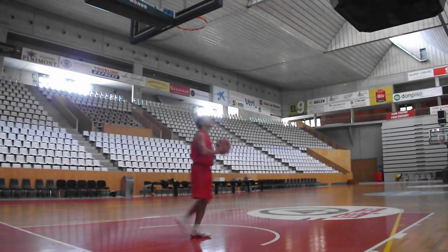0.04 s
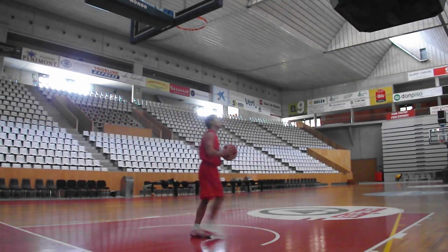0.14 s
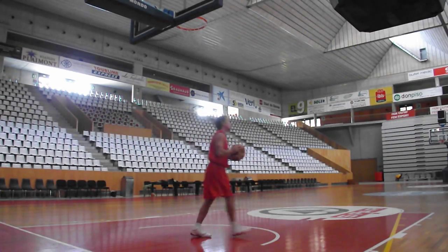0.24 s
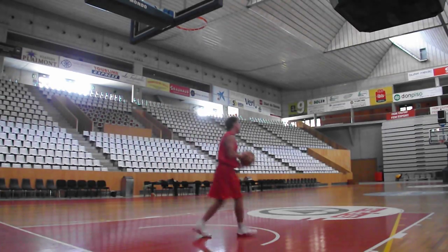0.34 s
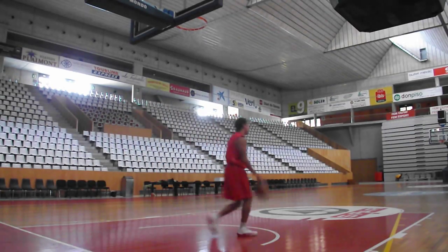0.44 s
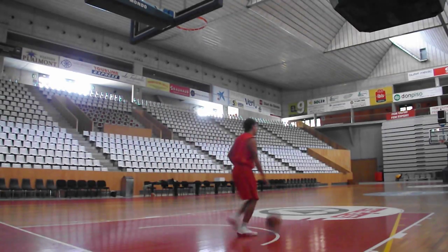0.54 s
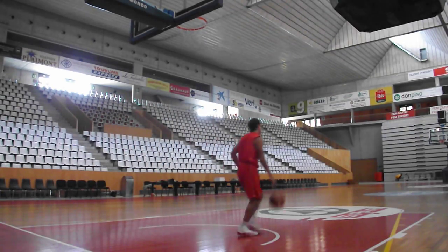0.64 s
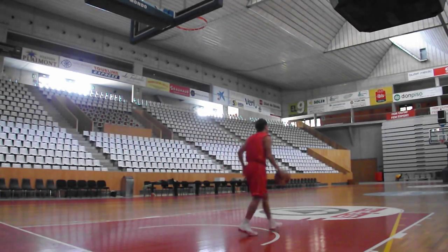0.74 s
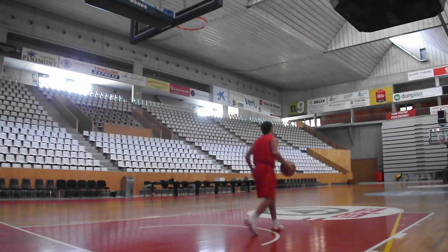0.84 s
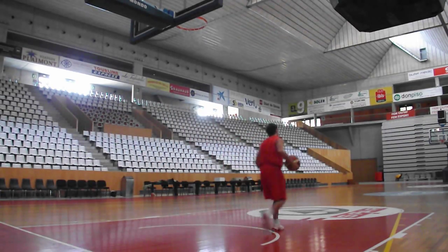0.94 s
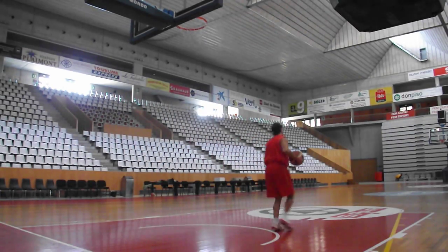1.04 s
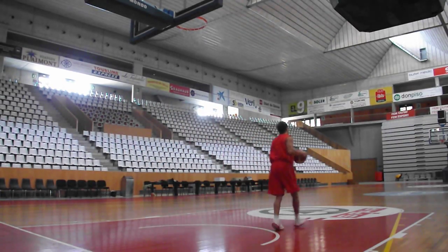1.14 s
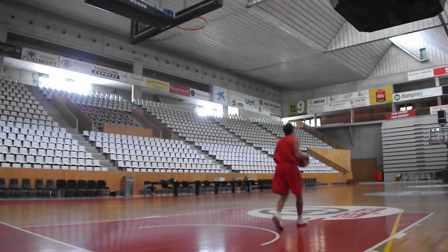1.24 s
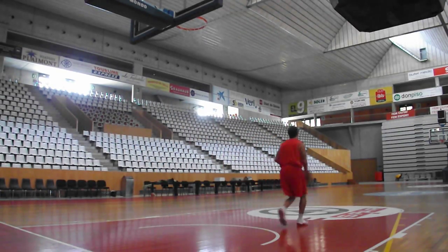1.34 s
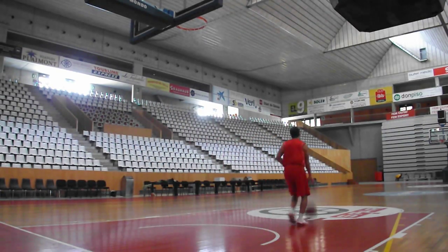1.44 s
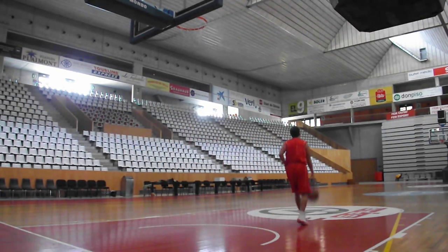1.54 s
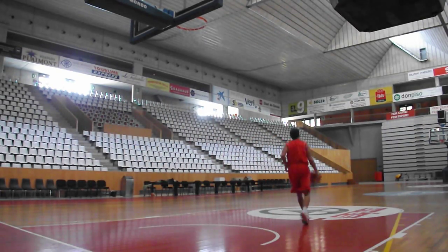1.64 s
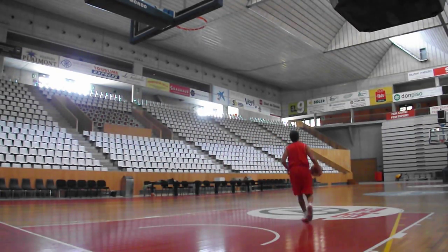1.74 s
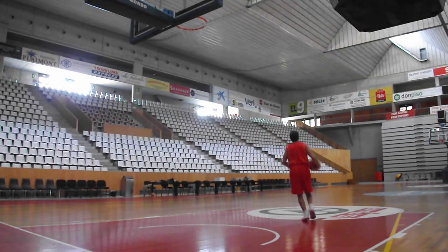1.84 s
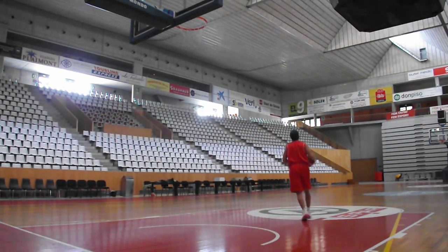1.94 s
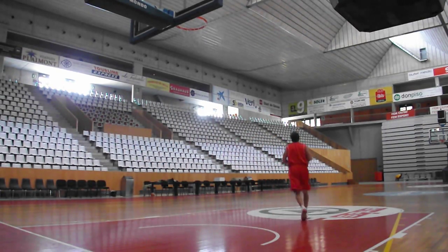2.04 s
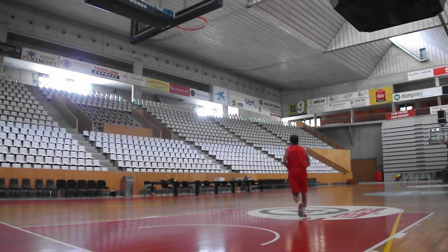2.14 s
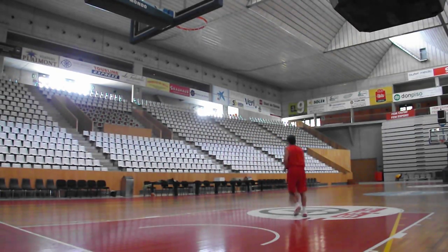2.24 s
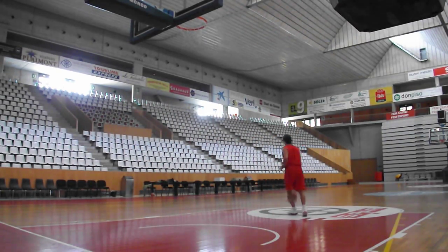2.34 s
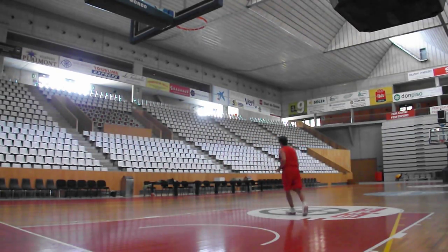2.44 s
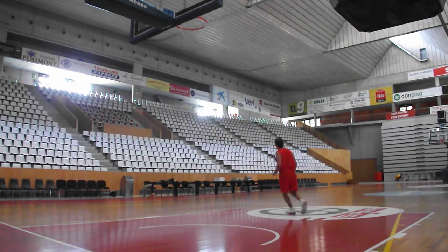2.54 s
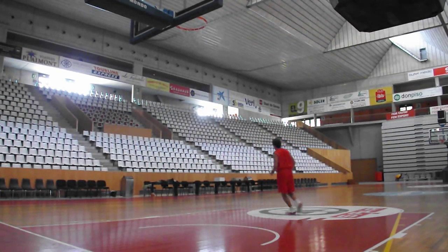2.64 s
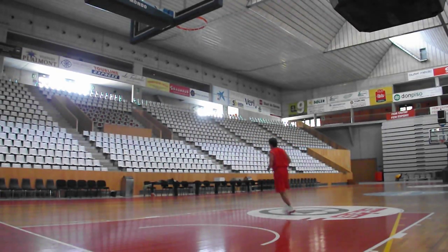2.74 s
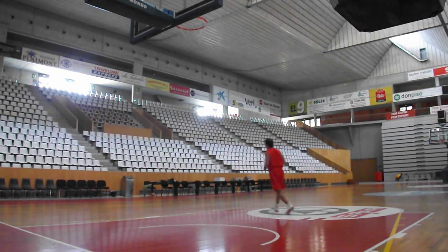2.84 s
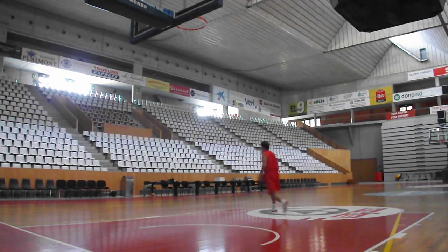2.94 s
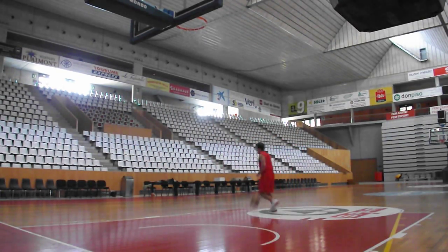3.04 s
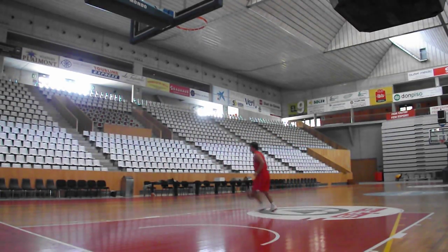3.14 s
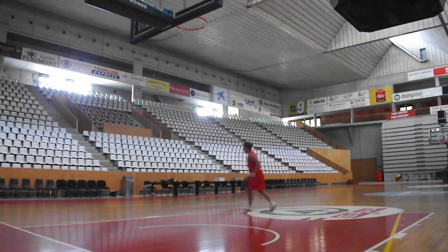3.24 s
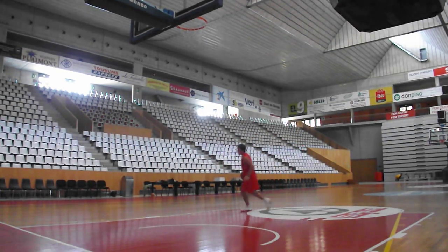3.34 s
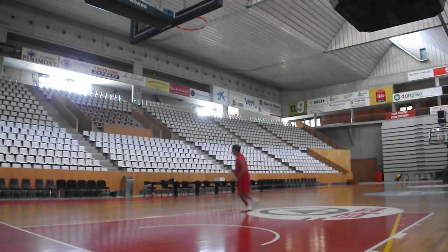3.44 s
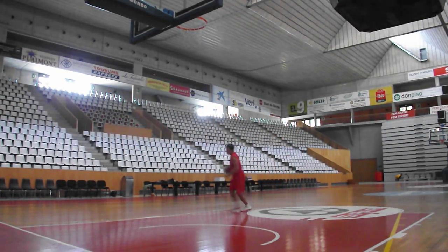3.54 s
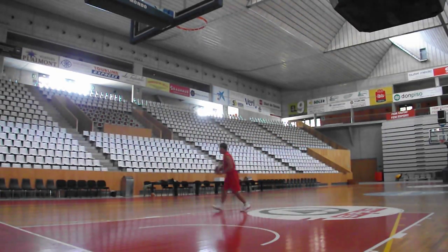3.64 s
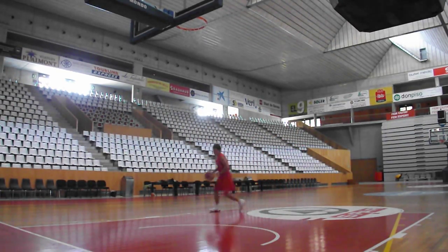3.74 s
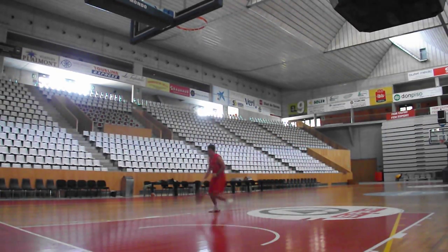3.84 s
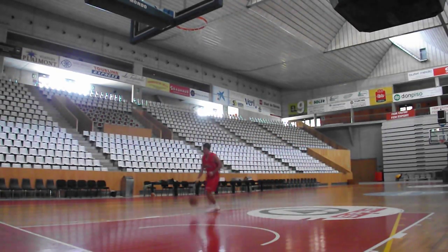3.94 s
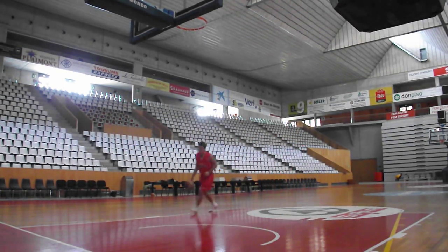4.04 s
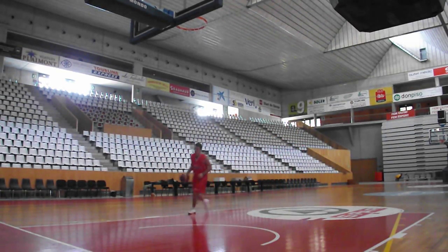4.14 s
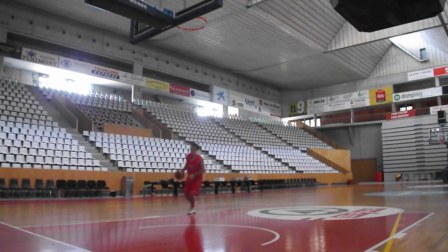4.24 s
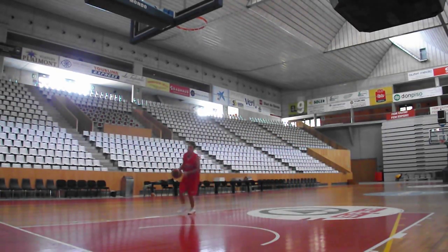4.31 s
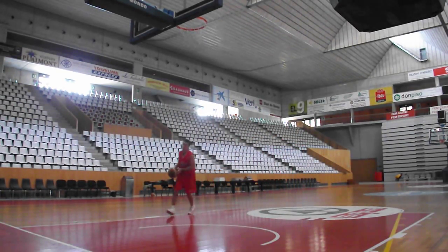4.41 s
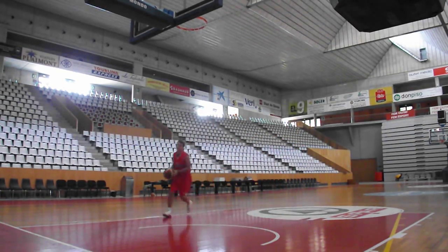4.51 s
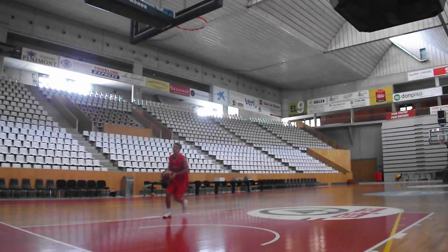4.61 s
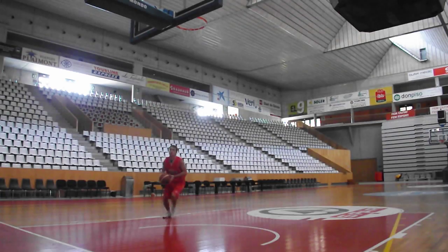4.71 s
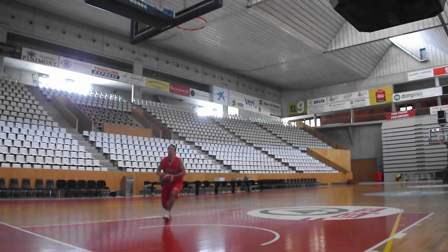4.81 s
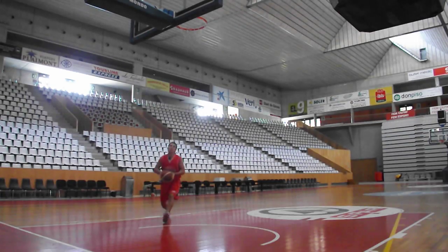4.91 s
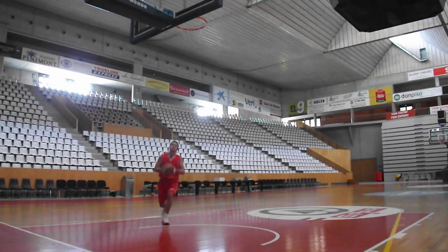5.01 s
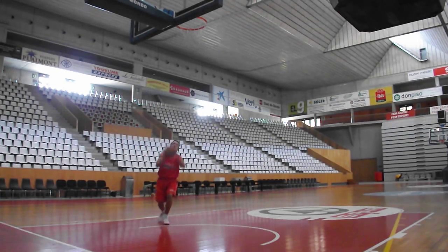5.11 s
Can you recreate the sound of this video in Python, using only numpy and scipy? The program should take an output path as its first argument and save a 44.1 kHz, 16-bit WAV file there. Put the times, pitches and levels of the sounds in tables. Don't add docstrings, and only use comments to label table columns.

```python
import sys
import numpy as np
from scipy import signal
from scipy.fft import rfft, irfft, next_fast_len
from scipy.io import wavfile
from scipy.ndimage import uniform_filter1d, map_coordinates

SR = 44100
rng = np.random.default_rng(int(sys.argv[2]) if len(sys.argv) > 2 else 0)


def to_wav(sig):
    pcm = np.clip(np.atleast_2d(sig), -1, 1) * 32767
    pcm = np.round(pcm).astype(np.int16)
    wavfile.write(sys.argv[1], SR, pcm.T)


def linear_from_db(decibels):
    return 10 ** (np.asarray(decibels, float) / 20)


N = 227952

# time in seconds, slap level in dB, thump level in dB, slap pitch as a ratio.
BOUNCES = [
    (0.5551, 9, 3, 0.91),
    (1.4714, 8.5, -1, 0.84),
    (2.314, 5.5, -2, 0.99),
    (3.0789, 9.5, -5.5, 0.98),
    (3.9207, 4, -3, 0.89),
]
# ball cavity level in dB, treble level in dB.
SPOT_TONES = [(3.5, 1.5), (-2, 1.5), (2, 0), (-3, 1), (6, -2)]
THUMP_LAGS = [-.0016, -.0013, -.0007, -.0013, -.0018]
# centre in Hz, width in Hz, level in dB.
SKIN = [(1270, 290, -12.5), (2980, 580, 2), (5500, 20000, -28.5)]
# frequency in Hz, spectrum level in dB.
BALL_AIR = [(150, -76), (250, 2), (526, -11), (861, -5.5), (1470, -7.5), (1720, -4), (1960, -13),
            (3170, -10), (6000, -51.5), (7800, -70), (13200, -120)]
# centre in Hz, width in Hz, level in dB.
BOARDS = [(79.7, 19, 16), (104, 18, 11.5), (133, 15, 1), (214, 35, -34)]
# frequency in Hz, spectrum level in dB.
SLAP_TAIL = [(150, 4), (250, 2), (327, -1.5), (371, -0.5), (561, -7), (1010, -5), (1220, -2.5),
             (1500, -4.5), (2910, 4), (3200, 2.5), (3810, -9.5), (7400, -32), (11000, -47), (14300, -79),
             (22000, -120)]
# frequency in Hz, spectrum level in dB.
THUMP_TAIL = [(13, -35), (22, -57), (46, 0.5), (92, 1), (148, -9.5), (188, -16.5), (272, -18.5), (328, -28),
              (450, -48), (580, -67), (990, -120)]
# frequency in Hz, time to fall 60 dB in seconds.
HALL_T60 = [(60, 2.75), (200, 2.33), (1000, 2.89), (3000, 1.91), (6000, 1.52), (10000, 0.91)]
# time in seconds, peak level in dB, pitch in Hz.
ECHOES = [(0.591, -2.5, 2950), (0.597, -13, 2960), (0.616, -11, 2960), (0.6224, -12, 2580),
          (0.6513, -19, 2870), (1.4816, -18, 2660), (1.5081, -3, 2700), (1.53, -12, 2730),
          (1.5352, -4, 2690), (1.5656, -4.5, 2760), (1.5848, -7, 2660), (2.3284, -16, 2830),
          (2.3502, -5.5, 3100), (2.3728, -7, 2400), (2.3848, -14, 3200), (2.501, -13.5, 3100),
          (3.0844, -17, 3180), (3.1138, -2, 2920), (3.1319, -8, 2560), (3.1457, -16, 2980),
          (3.1748, -14, 3200), (3.9277, -17, 3300), (3.9337, -8.5, 3200), (3.9551, -10.5, 3250),
          (3.963, -11, 2560), (3.973, -4, 2640), (3.9872, -8, 2650), (3.9994, -9.5, 2770),
          (4.0184, -11, 2660), (4.0753, -13, 2720)]
# time in seconds, click level in dB, thud level in dB, scuff level in dB,
# softness corner in Hz.
STEPS = [
    (.031, -34.5, -63, 9, 2600),
    (.094, -38, -48, 17, 2000),
    (.108, -33, -51, 14, 2000),
    (0.307, -31, -31.5, 7, 1480),
    (4.920, -23, -24, -1, 2250),
]
# frequency in Hz, spectrum level in dB.
VENT_AIR = [(12, -54), (20, 9), (54, 1.5), (280, -22), (339, -23.5), (894, -26), (1380, -22.5),
            (1520, -15.5), (1640, -25.5), (1850, -38.5), (2030, -39), (2590, -29.5), (4200, -28),
            (5360, -47), (6500, -50), (8450, -93), (14300, -120)]
# centre in Hz, width in Hz, level in dB rms.
DUCTS = [(1490, 150, -56), (1810, 137, -54)]
# frequency in Hz, spectrum level in dB.
HISS = [(4000, -45), (5500, 1), (9000, 1), (11000, -1.5), (11600, 4), (12200, -0.5), (15500, -2),
        (16300, 1)]


def unit(x):
    return x / np.sqrt(np.mean(x ** 2) + 1e-20)


def peak(x):
    return x / np.abs(x).max()


def along(points, hz):
    f, v = np.transpose(points)
    return np.interp(np.log(hz + 1), np.log(f + 1), v)


def filtered(x, response):
    m = next_fast_len(len(x) + 8192)
    return irfft(rfft(x, m) * response(np.fft.rfftfreq(m, 1 / SR)), m)[:len(x)]


def shaped_noise(count, curve):
    return unit(filtered(rng.standard_normal(count), lambda f: linear_from_db(along(curve, f))))


def modes(table):
    return lambda f: sum(linear_from_db(db) * 1j * f * w / (c * c - f * f + 1j * f * w) for c, w, db in table)


def add(x, s, sound):
    part = x[round(s * SR):][:len(sound)]
    part += sound[:len(part)]


def ball():
    x = np.zeros(N)
    for (s, slap_db, thump_db, pitch), (cavity_db, treble_db), lag_s in zip(BOUNCES, SPOT_TONES, THUMP_LAGS):
        add(x, s - .001, linear_from_db(-17) * slap(.8, smear_s=.0015, tail_db=8, soft_hz=1800))
        crack = slap(pitch, soft_hz=6000 * linear_from_db(treble_db * 2.1), body_db=5 + 1.2 * thump_db)
        add(x, s, linear_from_db(slap_db) * filtered(crack, lambda f: 1j * f / (580 + 1j * f)))
        add(x, s, linear_from_db(-18 + 0.42 * cavity_db) * ball_ring())
        add(x, s + lag_s, linear_from_db(thump_db) * thump())

        wall_s = .1762 - 0.0007 * s
        add(x, s + wall_s, linear_from_db(-13 + 0.25 * thump_db) * thump())
        add(x, s + .0355, linear_from_db(thump_db - 14) * thump(contact_s=0.0037))

        wash = tail(SLAP_TAIL, 0.036, 0.0072, lumpy_db=1.5, swell_db=1.25)
        wash = filtered(wash, lambda f: linear_from_db(treble_db / (1 + (4000 / (f + 1)) ** 4)))
        cavity = filtered(wash, modes([(1135, 280, 0)]))
        add(x, s, linear_from_db(-31 + 0.25 * treble_db) * (wash + (linear_from_db(cavity_db) - 1) * cavity))
        boom = tail(THUMP_TAIL, 0.0072, 0.058, lumpy_db=-2.0, swell_db=2.0)
        add(x, s, linear_from_db(-25 + 0.25 * thump_db) * boom)
    return x


def slap(pitch=1, smear_s=0.00048, tail_db=-14, soft_hz=6000, body_db=0):
    t = np.arange(1024) / SR
    drive = linear_from_db(tail_db - 60 * t / (7 * smear_s)) * rng.standard_normal(len(t))
    drive[:3] += 1.6
    (body_hz, body_w, db), *upper = SKIN
    skin = modes([(body_hz, body_w, db + body_db)] + [(c * pitch, w, g) for c, w, g in upper])
    return peak(filtered(drive, lambda f: skin(f) / (1 + 1j * f / soft_hz) ** 3))


def ring(t60):
    t = np.arange(SR // 5) / SR
    return linear_from_db(-60 * t / t60) * shaped_noise(len(t), BALL_AIR)


def ball_ring():
    def low(f):
        return 1 / (1 + (f / 1500) ** 4)

    lower = filtered(ring(0.2), low)
    upper = filtered(ring(0.1), lambda f: 1 - low(f))
    return lower + linear_from_db(5.0) * upper


def thump(contact_s=.007):
    t = np.arange(4096) / SR
    force = np.sin(np.pi * np.clip(t / contact_s, 0, 1)) ** 2
    return peak(filtered(force, lambda f: modes(BOARDS)(f) * (1j * f / (60 + 1j * f)) ** 2))


def tail(spectrum, start_s, build_s, lumpy_db, swell_db=0):
    t = np.arange(2 * SR) / SR
    grains = np.repeat(rng.standard_normal(len(t) // 64 + 1), 64)[:len(t)]
    sparse = linear_from_db(lumpy_db * np.exp(-t / 0.26) * grains)
    clusters = map_coordinates(rng.standard_normal(400), [t * 90])
    sparse = sparse * linear_from_db(0.35 * lumpy_db * clusters)
    hz, ts, z = signal.stft(unit(sparse * rng.standard_normal(len(t))), SR, nperseg=512)
    hz = hz[:, None]

    patches = uniform_filter1d(rng.standard_normal(z.shape), size=8, axis=0)
    patches = uniform_filter1d(patches, size=3, axis=1)
    far_end = np.exp(-((ts - .18) / .06) ** 2)
    decay_db = -60 * ts / along(HALL_T60, hz)
    level_db = 1.34 * unit(patches) + decay_db + swell_db * (1 + hz / 2500) * far_end
    wash = signal.istft(z * linear_from_db(level_db), SR, nperseg=512)[1][:len(t)]
    wash *= 1 - np.exp(-np.clip(t - start_s, 0, None) / build_s)
    wash = filtered(wash, lambda f: linear_from_db(along(spectrum, f)))
    return wash / np.sqrt(np.mean(wash[SR // 8:SR // 2] ** 2))


def echoes():
    x, hits = np.zeros(N), np.array(BOUNCES)[:, 0]
    for s, db, hz in ECHOES + flutter(hits):
        hit = np.searchsorted(hits, s) - 1
        delay, treble_db = s - hits[hit], SPOT_TONES[hit][1]
        smear_db = -10.5 + 45 * delay - 2.7 * treble_db
        soft_hz = 4000 * linear_from_db(0.9 * treble_db) / (1 + delay / 0.12)
        echo = slap(hz / 2900, smear_s=0.0028, tail_db=smear_db, soft_hz=soft_hz, body_db=-2)
        add(x, s + .0004, linear_from_db(db) * echo)
    return filtered(x, lambda f: (1j * f / (1020 + 1j * f)) ** 2) * linear_from_db(2.0)


def flutter(hits, count=8):
    start_s, end_s = 0.063, 0.33
    shape = (len(hits), count)
    delay = start_s + (end_s - start_s) * (np.arange(count) + rng.random(shape)) / count
    db = -17 - 22 * delay + 3.5 * rng.standard_normal(shape)
    hz = 2950 * np.exp(0.1 * rng.standard_normal(shape))
    return list(zip((hits[:, None] + delay).ravel(), db.ravel(), hz.ravel()))


def steps():
    x = np.zeros(N)
    for s, click_db, thud_db, scuff_db, soft_hz in STEPS:
        click = slap(0.97, smear_s=0.0025, tail_db=scuff_db, soft_hz=soft_hz, body_db=-4)
        add(x, s, linear_from_db(click_db) * click)
        add(x, s, linear_from_db(thud_db) * thump(contact_s=0.0029) + linear_from_db(thud_db - 18) * ring(0.07)[:4096])
        add(x, s, linear_from_db(thud_db - 20) * tail(THUMP_TAIL, .006, .012, lumpy_db=3))
        add(x, s, linear_from_db(click_db - 33) * tail(SLAP_TAIL, .01, .03, lumpy_db=5))
    return x


def ventilation():
    swell_db = map_coordinates(rng.standard_normal(60), [np.arange(N) * 9 / SR])
    air = shaped_noise(N, VENT_AIR)
    bass = filtered(air, lambda f: 1 / (1 + (f / 200) ** 4))
    x = linear_from_db(-38.5) * (air + (linear_from_db(swell_db) - 1) * bass)
    for hz, width_hz, db in DUCTS:
        x += linear_from_db(db) * unit(filtered(rng.standard_normal(N), modes([(hz, width_hz, 0)])))
    return x


def preamp_hiss():
    return linear_from_db(-64.5) * shaped_noise(N, HISS)


def interference():
    frame_hz, gap_s = 29.496, 1 / 1540
    x = np.zeros(N + SR)
    starts = np.arange(.0332, N / SR, 1 / frame_hz)
    for k in range(3):
        at = np.round((starts + k * gap_s) * SR).astype(int)
        x[at] = (-1) ** k * linear_from_db(rng.normal(0, 1.5, len(starts)))
    return linear_from_db(-39.0) * filtered(x[:N], modes([(11500, 9000, 0)]))


def gain_duck_db():
    step_db, step_s = 4, .0063
    t, duck_db = np.arange(N) / SR, np.zeros(N)
    for (s, _, thump_db, _), (_, treble_db), lag_s in zip(BOUNCES, SPOT_TONES, THUMP_LAGS):
        after = t - s - lag_s - .0066
        need_db = max(0, 4 + 0.41 * thump_db + 0.54 * treble_db)
        fall_db = step_db * np.ceil(np.clip(after / step_s, 0, None))
        duck_db += np.minimum(need_db, fall_db) * np.clip(1.3 - after / 0.23, 0, 1)
    return duck_db


def scene():
    return (ball() + echoes() + steps() + ventilation())[None]


def top_cut(x):
    return signal.sosfilt(signal.butter(12, 16380, fs=SR, output="sos"), x)


def record(dry):
    x = (dry[0] + preamp_hiss() + interference()) * linear_from_db(-gain_duck_db())
    x = np.clip(x, -1, 1)
    x = np.clip(filtered(x, lambda f: np.where(f < 15850, 1, .03)), -1, 1)
    return top_cut(x[None])


dry = scene()
out = record(dry)
to_wav(out)
```